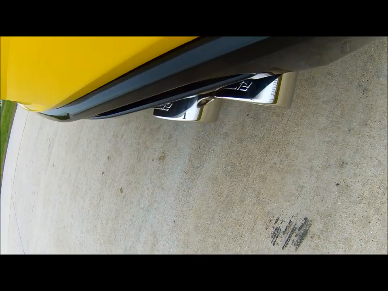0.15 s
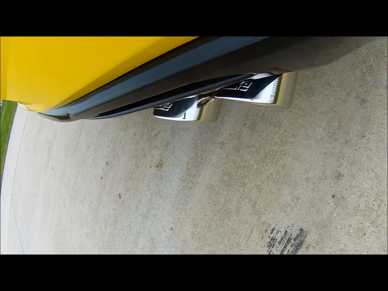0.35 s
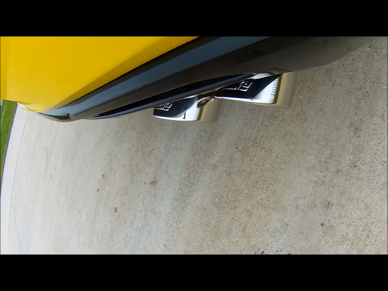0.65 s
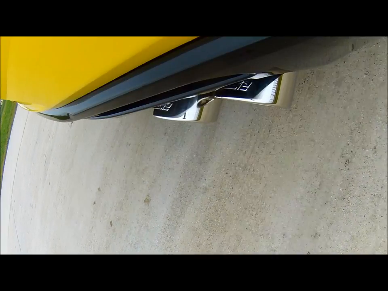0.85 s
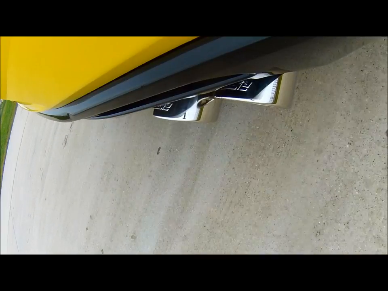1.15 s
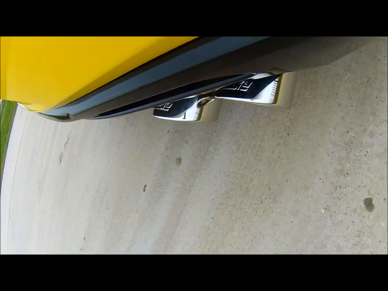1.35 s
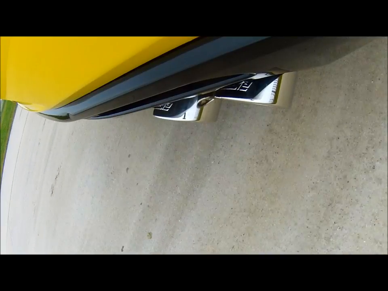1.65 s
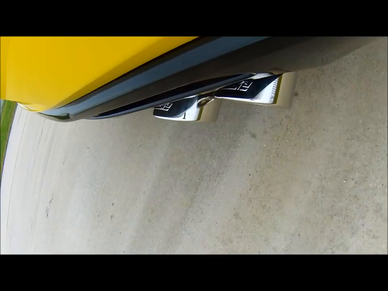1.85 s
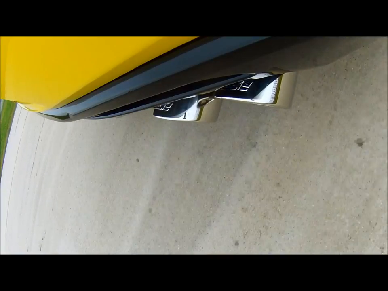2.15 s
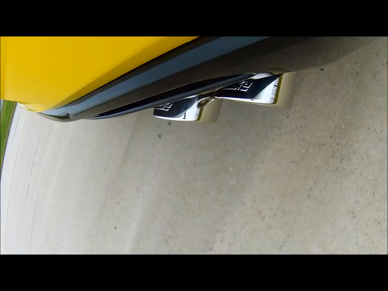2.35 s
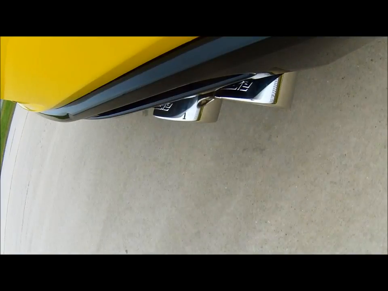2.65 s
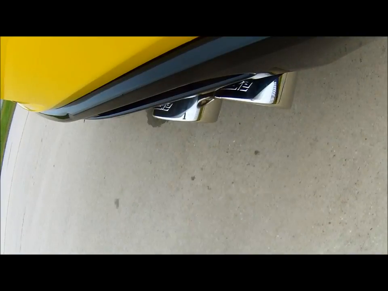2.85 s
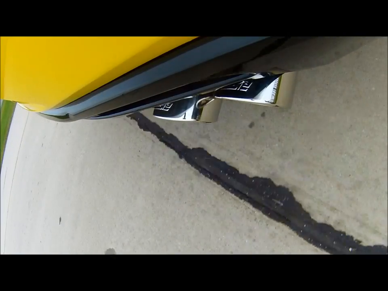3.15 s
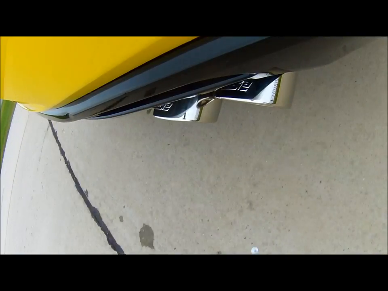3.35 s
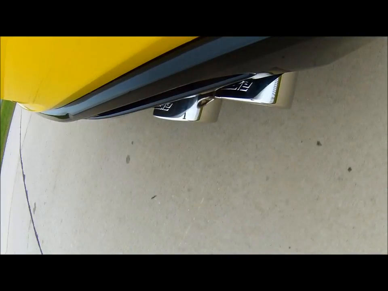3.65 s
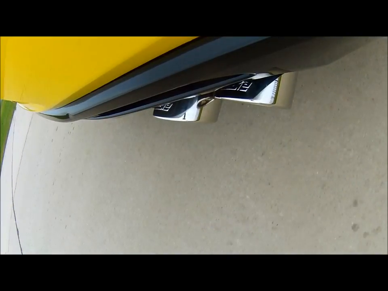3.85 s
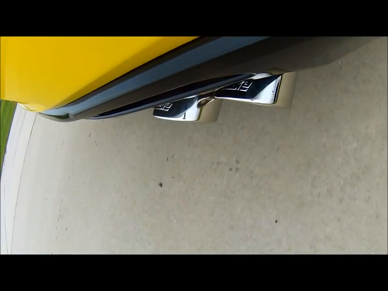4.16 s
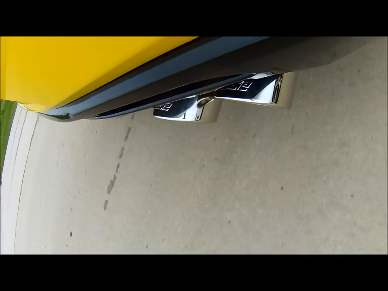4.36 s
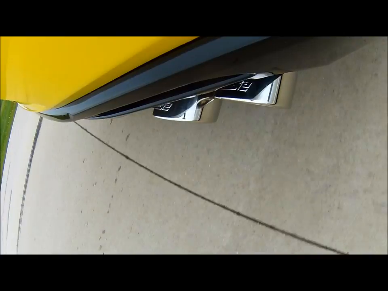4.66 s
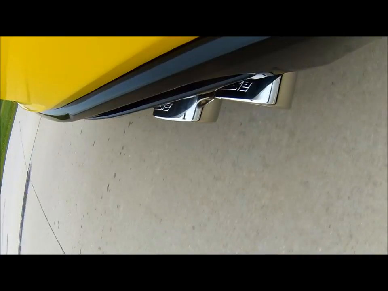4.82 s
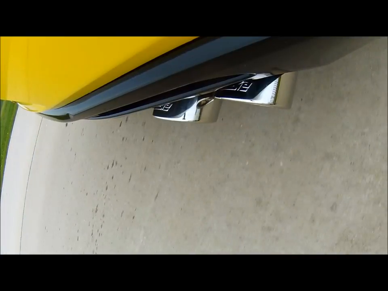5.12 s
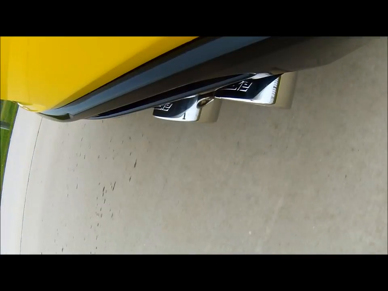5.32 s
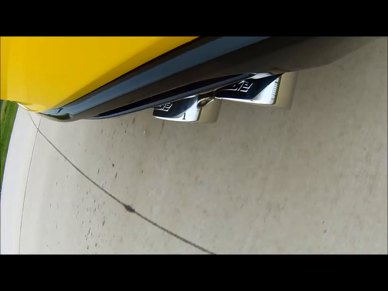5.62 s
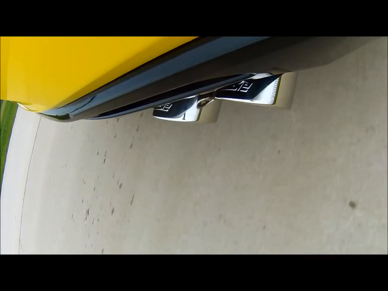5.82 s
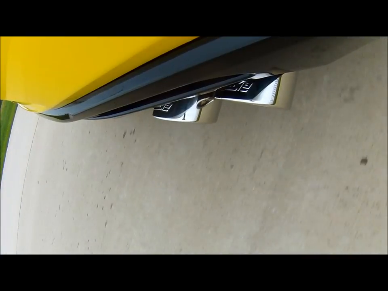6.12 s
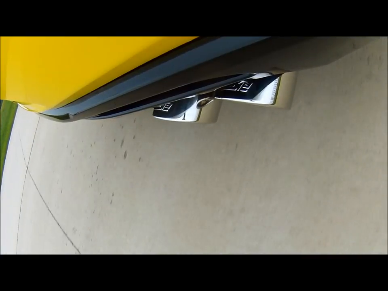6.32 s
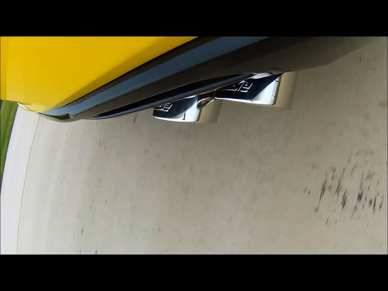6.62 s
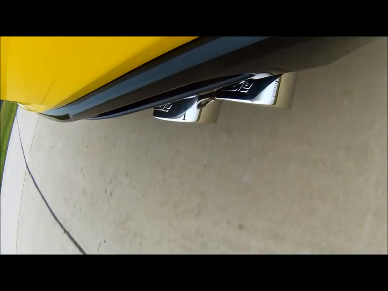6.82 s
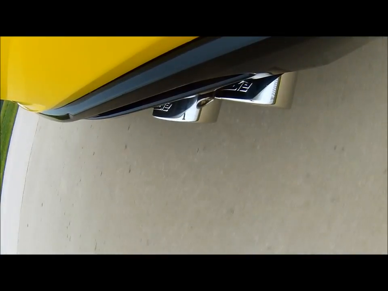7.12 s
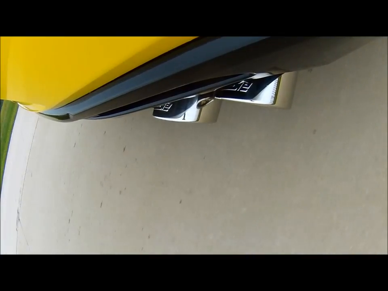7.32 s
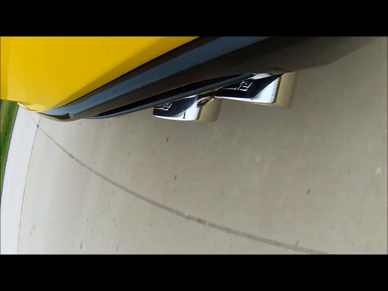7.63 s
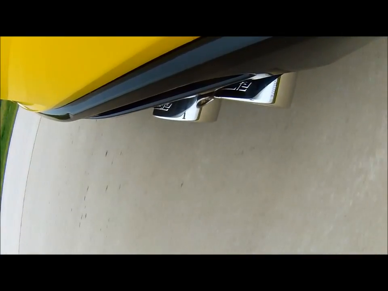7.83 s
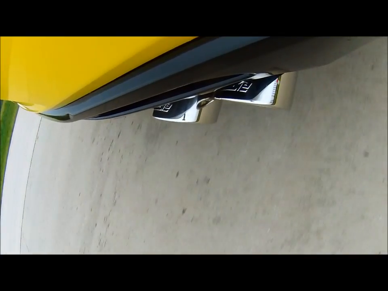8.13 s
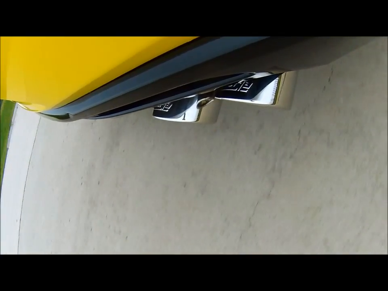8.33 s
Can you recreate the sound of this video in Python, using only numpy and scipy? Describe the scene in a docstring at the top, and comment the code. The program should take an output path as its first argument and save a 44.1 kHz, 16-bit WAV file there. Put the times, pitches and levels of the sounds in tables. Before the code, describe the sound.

Outdoors on a concrete road, a microphone sits beside a V8 car's tailpipes. Soft low burbling and deep shaking of the mount come first, with faint metallic pings. The engine then pulls hard, its pitch climbing under roar, whistle, rasp and hiss. It lifts for a gear change, pitch falling amid loose rattles, then barks back violently with hard knocks and overload.

```python
"""A V8 creeps along a concrete road while the mount of a small housed microphone shakes near 30 Hz, with rattles and pings.
From about 5.4 s it pulls hard: firing orders climb under the roar, whistle, rasp and jet hiss of the gas.
Near 7.6 s it lifts for a gear change: the gas quietens, the uneven orders stand out and the housing chatters.
From about 8.1 s it pulls again and barks on every other firing, with hard knocks of the housing and overload at full scale.
Sines make the orders, shaped noise the gas and the road, short noise bursts the rattles and ringing modes the pings."""
import sys
import numpy as np
from scipy import signal
from scipy.fft import rfft, irfft
from scipy.io import wavfile
from scipy.ndimage import uniform_filter1d

SR = 44100
rng = np.random.default_rng(int(sys.argv[2]) if len(sys.argv) > 2 else 0)


def generate_wav(signal):
    """Clip the signal to [-1, 1] and save it as 16-bit WAV at the path in sys.argv[1]."""
    frames = np.transpose(np.atleast_2d(signal))
    scaled = np.clip(frames, -1, 1) * 32767
    pcm = np.round(scaled).astype(np.int16)
    wavfile.write(sys.argv[1], SR, pcm)


def boost(x):
    """Linear amplitude factor 10**(x/20) for a level x in decibels (scalar or array-like)."""
    u = np.asarray(x, float) / 20
    return 10 ** u


N = 373968
T = np.arange(N) / SR   # time [s]


def rms_one(x):
    """Scales to rms 1."""
    return x / np.sqrt(np.mean(x ** 2) + 1e-20)


def in_time(rows):
    """Reads a curve of (time [s], value) at every sample."""
    s, value = np.transpose(rows)
    return np.interp(T, s, value)


def drift(rate_hz):
    """Slow chance of spread 1: noise through a double one-pole low-pass."""
    r = np.exp(-2 * np.pi * rate_hz / SR)
    slow = signal.lfilter([1], [1, -2 * r, r * r], rng.standard_normal(N + SR))
    return rms_one(slow[SR:])   # leaves out the settling of the filter


def resonate(x, peaks):
    """Parallel resonances (frequency [Hz], width [Hz], level [dB]), at least 10 Hz wide, neighbours in opposite sign."""
    out = np.zeros(N)
    for k, (hz, width_hz, db) in enumerate(peaks):
        r = np.exp(-np.pi * max(width_hz, 10) / SR)
        ring = signal.lfilter([1, 0, -1], [1, -2 * r * np.cos(2 * np.pi * hz / SR), r * r], x)
        out += (-1) ** k * boost(db) * (1 - r * r) / 2 * ring
    return out


def band(x, low_hz, high_hz):
    """Band-pass with rms 1."""
    return rms_one(signal.sosfilt(signal.butter(2, [low_hz, high_hz], "band", fs=SR, output="sos"), x))


def clicks(s, db):
    """Impulses of the given levels at the given times, over a floor too faint to hear."""
    out = np.full(N, 1e-18)
    out[(np.asarray(s) * SR).astype(int)] = boost(db)
    return out


# low road rumble: (frequency [Hz], relative density [dB per Hz])
ROAD_COLOUR = [(7.1, -24), (12, 9), (49, 8), (64, -16), (103, -24), (157, -34), (280, -32), (360, -50),
               (620, -120)]


def road_rumble():
    """Noise coloured like the rough road, with rms 1."""
    hz, db = np.transpose(ROAD_COLOUR)
    hz_grid = np.maximum(np.arange(N // 2 + 1) * SR / N, 1)
    colour_db = np.interp(np.log(hz_grid), np.log(hz), db)
    return rms_one(irfft(rfft(rng.standard_normal(N)) * boost(colour_db), N))


# the road sets the mount swinging: (start [s], length [s], pitch [Hz], level [dB])
SWINGS = [(0.046, 0.57, 41.6, -44.5), (0.66, 1.47, 28.74, -40), (1.957, 0.1, 36.4, -32),
          (2.292, 0.26, 31.3, -33), (2.671, 0.3, 31.54, -26.5), (3.019, 0.48, 33.65, -31.5),
          (3.511, 0.79, 32.67, -27.5), (4.42, 0.28, 35.7, -26), (4.852, 0.6, 34.33, -28.5),
          (5.531, 0.67, 30.47, -25.5), (6.197, 0.88, 34.7, -26), (6.851, 0.42, 40.8, -32.5),
          (7.283, 0.12, 30.7, -18), (7.479, 0.26, 37.8, -18), (7.737, 0.25, 27.35, -16.5),
          (8.061, 0.22, 30.2, -15), (8.349, 0.13, 27.2, -10.5)]
SWING_EDGE_S = .06                  # rise and fall of a swing
REST_DB = -44                       # shaking between swings
JOLT_DB, RUMBLE_DB = -9.5, -6.5     # beside the swing
THUD_DB = -2.5                      # at a swing of full scale


def mount():
    """Swings near 30 Hz that rise, hold and die; jolts, rumble and the thud of bottoming out grow with them."""
    swing, strength = 0, boost(REST_DB)
    for start, length, hz, db in SWINGS:
        to_edge = np.minimum(T - start, start + length - T)
        shape = boost(db) * np.sin(np.pi / 2 * np.clip(to_edge / SWING_EDGE_S, 0, 1))
        swing = swing + shape * np.sqrt(2) * np.sin(2 * np.pi * hz * (T - start))
        strength = strength + shape
    jolts = boost(JOLT_DB) * strength * band(band(rng.standard_normal(N), 24.3, 42), 18, 48)
    trend = uniform_filter1d(strength, size=SR // 2)      # the rumble follows only the slow trend
    rumble = boost(RUMBLE_DB) * trend * road_rumble()
    # the square leaves the thud to the hard swings
    thud = boost(THUD_DB) * strength ** 2 * band(rng.standard_normal(N), 29, 108)
    return swing + thud + jolts + rumble


# single rattles of the housing, faint and loud, before colour and gain:
# (time [s], bright tick [dB], knock in the body [dB])
RATTLES = [(0.767, -64, -45), (2.421, -53, -41), (7.603, -49, -21), (7.673, -36, -30), (7.678, -43, -20),
           (7.736, -54, -32), (7.805, -41, -23), (7.83, -56, -41), (7.871, -41, -53), (7.876, -47, -25),
           (7.903, -45, -46), (7.915, -26, -44), (7.919, -41, -41), (7.9527, -26.5, -46), (7.96, -40, -40),
           (8.0204, -52, -32), (8.048, -52, -25), (8.092, -52, -38), (8.115, -44, -40), (8.127, -27, -43),
           (8.133, -44, -42), (8.215, -34, -36), (8.221, -37, -37), (8.349, -44, -9), (8.3565, -41, -2),
           (8.365, -46, -15), (8.381, -44, -8), (8.387, -38, -6), (8.39, -36, 0), (8.396, -32, 4.5),
           (8.404, -36, -7), (8.411, -44, -9), (8.417, -30, -3), (8.429, -36, -6), (8.438, -30, 6.5),
           (8.442, -40, -8), (8.4529, -42, -7), (8.471, -40, -6), (8.4757, -32, 0)]
# resonances of tick and knock: (frequency [Hz], width [Hz], level [dB])
TICK_COLOUR = [(3580, 3600, -1.5), (5900, 1700, 1), (9000, 2000, -9), (12200, 4000, -12)]
KNOCK_COLOUR = [(1300, 300, 5), (2350, 330, 4), (3550, 450, -4), (5800, 1500, -9)]
# small rattles at random once the gear change has shaken the housing loose
CHATTER_FROM_S, CHATTER_PER_S = 7.7, 8
CHATTER_TICK_DB, CHATTER_KNOCK_DB, CHATTER_SPREAD_DB = -54, -36, 3   # levels before colour and gain
TICK_FADE_S, KNOCK_FADE_S = .0025, .0032   # time constants
TICK_GAIN_DB, KNOCK_GAIN_DB = 8.5, 7.0


def rattles():
    """Each rattle is a burst of noise that dies within milliseconds: a bright tick and a duller knock."""
    s, tick_db, knock_db = np.transpose(RATTLES)
    chatter = (rng.random(N) < CHATTER_PER_S / SR) * (np.arange(N) > CHATTER_FROM_S * SR)
    chatter = chatter * boost(CHATTER_SPREAD_DB * rng.standard_normal(N))
    ticks = clicks(s, tick_db) + boost(CHATTER_TICK_DB) * chatter
    knocks = clicks(s, knock_db) + boost(CHATTER_KNOCK_DB) * chatter
    noise = rng.standard_normal(N)
    tick_burst = noise * signal.lfilter([1], [1, -np.exp(-1 / (TICK_FADE_S * SR))], ticks)
    knock_burst = noise * signal.lfilter([1], [1, -np.exp(-1 / (KNOCK_FADE_S * SR))], knocks)
    tick = resonate(tick_burst, TICK_COLOUR)
    dull = signal.butter(6, 6900, fs=SR, output="sos")
    knock = signal.sosfilt(dull, resonate(knock_burst, KNOCK_COLOUR))
    return boost(TICK_GAIN_DB) * tick + boost(KNOCK_GAIN_DB) * knock


# short metallic pings of a loose part: (time [s], strength of the stroke [dB])
PINGS = [(0.5082, -56), (0.6878, -56), (0.7711, -62), (1.1967, -59), (2.1596, -53), (2.2828, -54),
         (2.4334, -53), (2.5222, -51), (3.5234, -53), (4.0934, -51), (4.4665, -46), (4.8722, -50),
         (7.959, -42), (7.9706, -36), (8.016, -38), (8.05, -42), (8.209, -34), (8.2295, -26.5)]
# its modes: (frequency [Hz], level beside the stroke [dB], decay by 60 dB [s])
PING_MODES = [(2260, 9, 0.06), (2160, -38, 0.037), (2770, 4.5, .03)]


def pings():
    """A few close modes of a loose metal part, struck softly and left to ring."""
    s, db = np.transpose(PINGS)
    out = np.zeros(N)
    for hz, level_db, t60_s in PING_MODES:
        r, w = boost(-60 / (t60_s * SR)), 2 * np.pi * hz / SR
        out += signal.lfilter([0, np.sin(w)], [1, -2 * r * np.cos(w), r * r], clicks(s, db + level_db))
    return band(out, 2000, 2560) * np.std(out)      # a soft contact has no click


# steps of gas flow at which the level of each layer is given: [dB]
FLOW_STEPS_DB = [-80, -75, -70, -66, -62, -52, -36, -29, -20]


def with_flow(levels_db, flow_db):
    """Level of a layer at the given gas flow."""
    return np.interp(flow_db, FLOW_STEPS_DB, levels_db)


def gusts(turn, depth, cycle_depth, flutter_db):
    """Noise puffed out once a firing, stronger from some cylinders, with a chance flutter."""
    cycle = turn / 8   # all eight cylinders fire in one cycle
    puff = np.exp(depth * np.cos(turn) + cycle_depth * np.cos(cycle))
    flutter = boost(flutter_db * (drift(13.0) + 1.27 * drift(81.0)))
    return rms_one(puff * flutter * rng.standard_normal(N))


# rough low boom at each step of flow: (level [dB])
BOOM_DB = [-80, -77, -76, -80, -39, -37.5, -45, -38.5, -47]


def boom(flow_db):
    """Band of low noise, strong at middle flows and weaker at the highest."""
    return boost(with_flow(BOOM_DB, flow_db)) * band(rng.standard_normal(N), 53, 134)


# low resonances of the drone: (frequency [Hz], width [Hz], level [dB])
DRONE_PEAKS = [(118, 12, -25.5), (209, 18, 0), (271, 21, -4), (324.9, 4.2, 6), (384, 51, -3), (472, 61, -5),
               (620, 34, -10.5), (690, 160, -40)]
# drone at each step of flow: (level [dB])
DRONE_DB = [-57, -55, -51, -49, -43, -37, -46, -40, -20]


def drone(turn, flow_db):
    """Puffs of gas ring the low resonances."""
    puffs = gusts(turn, depth=0.2, cycle_depth=0.014, flutter_db=0.9)
    return boost(with_flow(DRONE_DB, flow_db)) * rms_one(resonate(puffs, DRONE_PEAKS))


# resonances of pipes and panels near the microphone:
# (frequency [Hz], width [Hz], in the roar [dB], in the whistle [dB], in the rasp [dB])
BODY = [(798, 92, -0.5, 3, -10.5), (1010.5, 49.3, -1, 14.5, 1), (1175, 95, -7, 8.5, 3.5),
        (1335, 12.5, -1.5, -29, 2.5), (1420, 29, -3.5, 8, -1), (1578.4, 39, -33, 8, 7.5),
        (1764, 74, -9, -4, -2), (2095, 71, -17.5, 7.5, 8), (2296, 53, -6, 2, 5), (2497, 47, -18, 6.5, 7),
        (2666, 175, -23.5, -8, 0.5), (2853, 150, -23, -1.5, -1), (3162, 70, -45, -6, -1),
        (3343, 63, -10.5, 7.5, -22), (3532, 89, -16.5, -0.5, -4), (3650, 47, -19, -14, 0.5),
        (3956, 170, -46, -11.5, -1.5), (4310, 83, -21, -7, -37), (4630, 23, -33, -44, -39),
        (5168, 220, -34, -33, -0.5), (5825, 114, -30, -17, -7.5), (6250, 134, -36, -11.5, -9.5),
        (6730, 250, -55, -33, -14.5), (7250, 66, -28, -37, -20.5)]


def through_body(gas, layer):
    """Gas noise rings the pipes and panels, with rms 1; layer: 0 roar, 1 whistle, 2 rasp."""
    hz, width_hz, *layers_db = np.transpose(BODY)
    return rms_one(resonate(gas, zip(hz, width_hz, layers_db[layer])))


# roar, before the panel filter, at each step of flow: (level [dB])
ROAR_DB = [-68.5, -56.5, -52, -46.5, -43, -35, -35.5, -28, -13]


def roar(turn, flow_db):
    """Deep puffs of gas in the pipes and panels."""
    puffs = gusts(turn, depth=0.35, cycle_depth=0.093, flutter_db=1.5)
    return boost(with_flow(ROAR_DB, flow_db)) * through_body(puffs, 0)


# whistle, before the panel filter, at each step of flow: (level [dB])
WHISTLE_DB = [-83, -69, -70, -57.5, -35.5, -38.5, -24, -27, -22]


def whistle(turn, flow_db):
    """Steadier gas in the same resonances, balanced towards its own set of pitches."""
    puffs = gusts(turn, depth=0.047, cycle_depth=0.025, flutter_db=1.3)
    return boost(with_flow(WHISTLE_DB, flow_db)) * through_body(puffs, 1)


def rasp(gas, flow_db):
    """Rushing gas in the pipes and panels; its level goes with the flow."""
    rasp_db = 8.5   # beside the flow
    return boost(flow_db + rasp_db) * through_body(gas, 2)


# colour of the jet hiss: (frequency [Hz], width [Hz], level [dB])
JET_COLOUR = [(7340, 130, 5), (8080, 990, 4.5), (8850, 360, 3), (8770, 600, -5), (9960, 610, 1.5),
              (11030, 340, -2), (12500, 1000, -6.5), (14500, 2200, -10.5)]


def jet(gas, flow_db):
    """Treble hiss of the same gas leaving the pipes."""
    jet_db = -20.5   # beside the flow
    return boost(flow_db + jet_db) * rms_one(resonate(gas, JET_COLOUR))


# which pattern of the cylinders sounds:
# (time [s], pattern: 0 light load, 1 first pull, 2 throttle shut, 3 second pull)
PATTERN = [(5.3, 0), (5.7, 1), (7.6, 1), (7.66, 2), (8.28, 2), (8.35, 3)]


def second_pull():
    """Rises from 0 to 1 as the second pull sets in."""
    return np.clip(in_time(PATTERN) - 2, 0, 1)


def bark(turn):
    """Gain that peaks on every other firing in the second pull; no two barks are alike."""
    depth, one_bark_s, spread_db = .6, 8.359, 3
    grown = second_pull() ** 2
    phase = (turn - turn[int(one_bark_s * SR)]) / 2   # a full turn every two firings
    puff = np.exp(depth * grown * (np.cos(phase) - .5))
    return puff * boost(spread_db * grown * drift(40))


SHUT_S, OPEN_S, THROTTLE_MOVE_S = 7.61, 8.11, .03   # throttle for the gear change


def shut_between(from_s, to_s, move_s):
    """1 while shut, 0 while open, with straight ramps."""
    return np.clip(np.minimum(T - from_s, to_s - T) / move_s, 0, 1)


def wandering_turn(turn, shut):
    """Slow random phase wander that roughens the firing lines, more with the throttle shut."""
    open_rad, added_shut_rad = .012, .04   # per eighth of the firing rate
    return turn + 8 * (open_rad + added_shut_rad * shut) * drift(6)


# firing tone and its octave as the pipes pass them, before the gains of flow and throttle:
# (rate [firings per s], tone [dB], octave [dB])
FIRING = [(41, -39, -56), (57, -43, -57), (62, -45, -51), (70, -47, -57), (84, -43, -57), (95, -39, -50),
          (112, -39, -55), (119, -39, -53), (124, -33, -51), (128, -34, -51), (133, -45, -52),
          (140, -36, -52), (150, -38, -45), (158, -36, -37), (175, -42, -30), (195, -37, -34),
          (215, -33, -36), (240, -39, -32), (257, -44, -35), (275, -42, -34)]
# added to both at each step of flow: (gain [dB])
FIRING_GAIN_DB = [0, 0, 0, 0, 0, -6, 0, 0, 11]
SHUT_FIRING_DB, FIRING_SAG_DB_PER_S = -4, 34   # the even beat weakens with the throttle shut
SECOND_OCTAVE_DB = 4                           # the octave gains so much in the second pull


def firing_tone(per_s, turn, shut, flow_db):
    """Two sines, at the firing rate and its octave; as one swells the other fades a little."""
    unsteady_db = 1.6 * drift(5)
    rate, tone_db, octave_db = np.transpose(FIRING)
    shut_db = shut * (SHUT_FIRING_DB - FIRING_SAG_DB_PER_S * (T - SHUT_S))
    gain_db = with_flow(FIRING_GAIN_DB, flow_db) + shut_db
    tone_db = np.interp(per_s, rate, tone_db) + gain_db + unsteady_db
    octave_db = np.interp(per_s, rate, octave_db) + gain_db - unsteady_db + SECOND_OCTAVE_DB * second_pull()
    return np.sqrt(2) * (boost(tone_db) * np.sin(turn) + boost(octave_db) * np.sin(2 * turn + 1))


# the eight cylinders do not sound alike, so lines stand at eighths of the firing rate,
# in a pattern that repeats every eight: (eighths past a multiple of the firing rate,
# light load [dB], first pull [dB], throttle shut [dB], second pull [dB])
CYLINDERS = [(0, 5, 3, 0, 15), (1, -7, -7, 4, 2), (2, 4, -1, -1, 4), (3, -1, 1, 4, 5), (4, -5, 0, -4, 9),
             (5, -3, 0, -1, 5), (6, -3, 3, -2, 8), (7, 0, -9, -6, 2)]
# colour that the lines take on as they sweep through the pipe resonances:
# (frequency [Hz], until the gear change [dB], in the second pull [dB])
PIPE = [(60, -9, -9), (130, -11, -10), (210, -14, -10), (270, -19, -12), (306, -18, -6), (325, 0, -8),
        (350, -2, -8), (420, -6, -9), (490, -7, -6), (560, -12, -4), (620, -7, -3), (740, -8, -9),
        (900, -11, -16), (1020, -4, -19), (1200, -12, -16), (1400, -26, -26)]
# orders, before pattern, colour and throttle, at each step of flow: (level [dB])
ORDERS_DB = [-67, -59, -57, -52, -49, -46, -41, -33, -28]
LOWEST_EIGHTH, HIGHEST_EIGHTH = 5, 44
# above the peak each eighth costs a fall: halved in the second pull, with more added by a shut throttle
ORDER_PEAK, ORDER_FALL_DB, SHUT_FALL_DB = 17, .33, .5
ORDERS_SHUT_S, ORDERS_BACK_S = 7.63, 8.33   # the uneven orders follow the throttle late
SHUT_ORDERS_DB, ORDERS_SAG_DB_PER_S = 11, 27
SWELL_DB, SHUT_SWELL_DB = 3.3, 6            # how unevenly each line sounds, throttle open and shut


def cylinder_orders(per_s, turn, shut, flow_db):
    """Sines on eighths of the firing rate, each swelling by chance and coloured by the pipes."""
    pipe_hz, before_db, after_db = np.transpose(PIPE)
    coarse = np.arange(0, N, 256)   # levels move slowly, so few points will do
    pattern, after, shut_coarse = in_time(PATTERN)[coarse], second_pull()[coarse], shut[coarse]
    late = shut_between(ORDERS_SHUT_S, ORDERS_BACK_S, 2 * THROTTLE_MOVE_S)
    late_db = late * (SHUT_ORDERS_DB - ORDERS_SAG_DB_PER_S * (T - SHUT_S))
    orders_db = (with_flow(ORDERS_DB, flow_db) + late_db)[coarse]
    spread_db = SWELL_DB + (SHUT_SWELL_DB - SWELL_DB) * shut_coarse
    fall_db = ORDER_FALL_DB * (1 - after / 2) + SHUT_FALL_DB * shut_coarse
    out = np.zeros(N)
    for eighths in range(LOWEST_EIGHTH, HIGHEST_EIGHTH + 1):
        if eighths in (8, 16):   # the firing tone and its octave
            continue
        cylinder_db = np.interp(pattern, [0, 1, 2, 3], CYLINDERS[eighths % 8][1:])
        cylinder_db = cylinder_db - fall_db * max(eighths - ORDER_PEAK, 0)
        swell_db = spread_db * np.interp(coarse, np.linspace(0, N, num=90), rng.standard_normal(size=90))
        place = np.log(per_s[coarse] * eighths / 8)
        colour_db = ((1 - after) * np.interp(place, np.log(pipe_hz), before_db)
                     + after * np.interp(place, np.log(pipe_hz), after_db))
        level = boost(cylinder_db + swell_db + colour_db + orders_db)
        line = np.sin(turn * eighths / 8 + rng.uniform(0, 2 * np.pi))
        out += np.interp(np.arange(N), coarse, level) * line
    return np.sqrt(2) * out


# engine speed: (time [s], rate [firings per s])
SPEED = [(0.0, 40.9), (0.3, 46.0), (0.6, 54.7), (0.9, 59.7), (1.5, 57.2), (1.85, 57.8), (2.1, 60.2),
         (2.4, 68.4), (3.0, 89.6), (3.3, 93.4), (3.9, 84.6), (4.2, 83.6), (4.5, 92.7), (5.1, 111.7),
         (5.4, 126.5), (5.7, 145.6), (6.0, 170.1), (6.45, 206.5), (6.9, 237.5), (7.5, 273.3), (7.56, 275),
         (7.62, 271), (7.7, 258.0), (7.9, 233.5), (8.0, 218.2), (8.07, 190), (8.11, 168), (8.16, 177),
         (8.22, 186), (8.3, 205.1), (8.4, 200.2), (8.48, 198.0)]
# gas flow through the pipes, to which the layers are set: (time [s], level [dB])
FLOW = [(0.0, -77), (0.28, -77), (0.4, -73), (0.61, -67.5), (0.9, -68.5), (1.15, -73), (1.89, -71.5),
        (3.21, -64.5), (4.08, -66.5), (4.7, -63.5), (5.31, -62.5), (5.5, -48.5), (6.04, -34.5),
        (6.31, -33.5), (7.32, -29.5), (7.46, -27.5), (7.6, -31.5), (7.65, -48), (7.89, -54), (8.1, -56),
        (8.2, -45), (8.29, -27), (8.36, -24), (8.43, -24.5), (8.48, -21)]


def exhaust():
    """Firing lines over drone and boom, with the roar, whistle and rasp of the gas and the hiss of the jet."""
    per_s, flow_db = in_time(SPEED), in_time(FLOW)
    turn = 2 * np.pi * np.cumsum(per_s) / SR   # one full turn a firing
    shut = shut_between(SHUT_S, OPEN_S, THROTTLE_MOVE_S)
    line_turn = wandering_turn(turn, shut)
    gas = gusts(turn, depth=0.044, cycle_depth=0.16, flutter_db=0.52)
    barking = bark(turn)
    upper = barking * (roar(turn, flow_db) + whistle(turn, flow_db) + rasp(gas, flow_db))
    # the panels pass little bass, so the lines stand clear, and little above 7 kHz, where the jet takes over
    panels = signal.butter(4, [700, 7400], "band", fs=SR, output="sos")
    upper = signal.sosfilt(panels, upper)
    lines = firing_tone(per_s, line_turn, shut, flow_db) + cylinder_orders(per_s, line_turn, shut, flow_db)
    low = drone(turn, flow_db) + boom(flow_db)
    return np.sqrt(barking) * (lines + low) + upper + jet(gas, flow_db)


def scene():
    """All sources at the microphone."""
    return (mount() + rattles() + pings() + exhaust())[None]


def roll_off(x):
    """The treble ends steeply here."""
    return signal.sosfilt(signal.butter(12, 15530, fs=SR, output="sos"), x)


def record(dry):
    """The microphone adds its hiss and overloads at full scale."""
    self_noise_db = -67.5
    hiss = boost(self_noise_db) * rng.standard_normal(dry.shape)
    mix = np.clip(dry + hiss, -1, 1)
    return roll_off(mix)


dry = scene()
out = record(dry)
generate_wav(out)
```